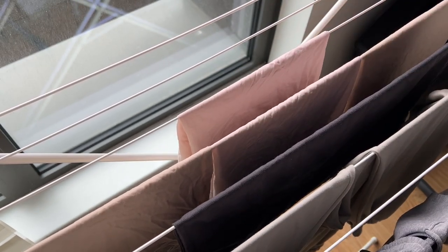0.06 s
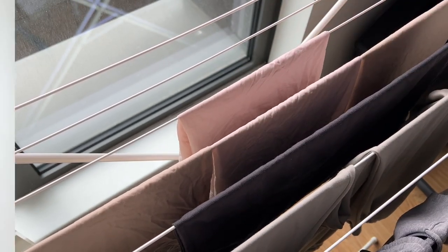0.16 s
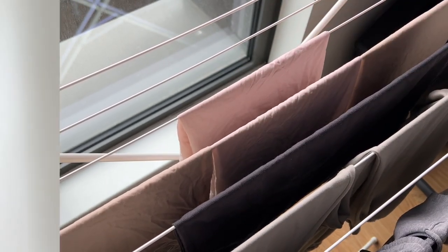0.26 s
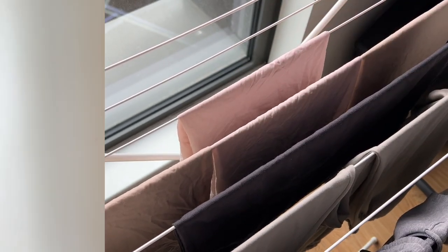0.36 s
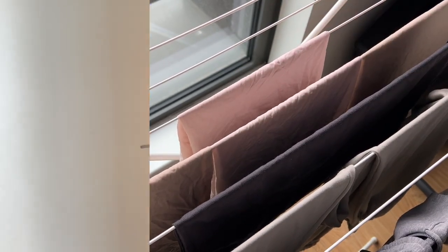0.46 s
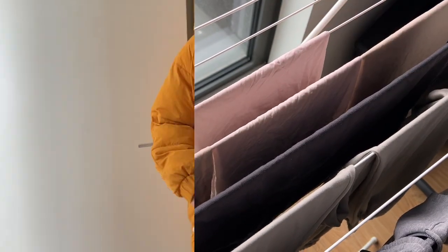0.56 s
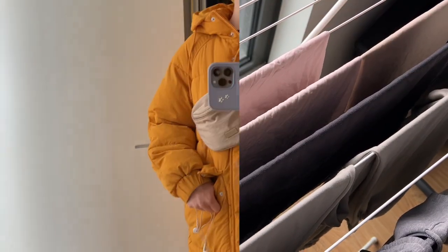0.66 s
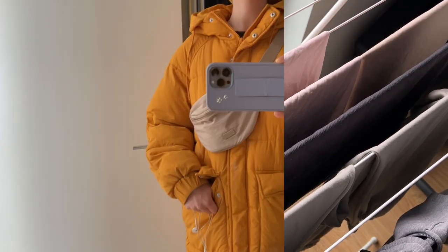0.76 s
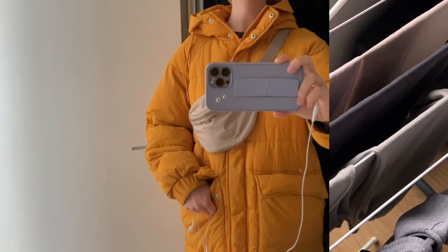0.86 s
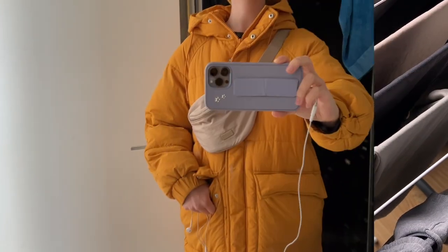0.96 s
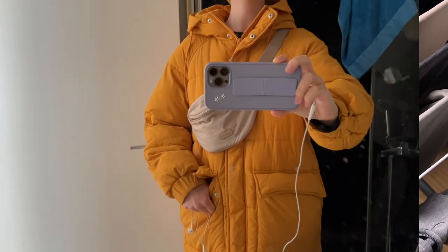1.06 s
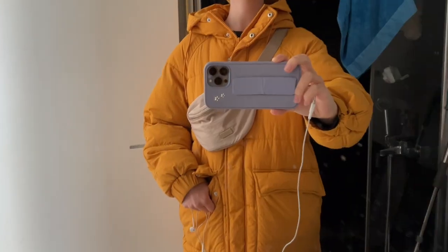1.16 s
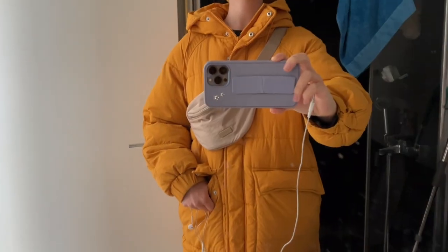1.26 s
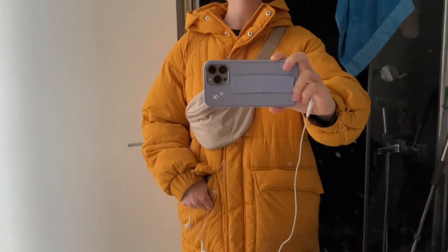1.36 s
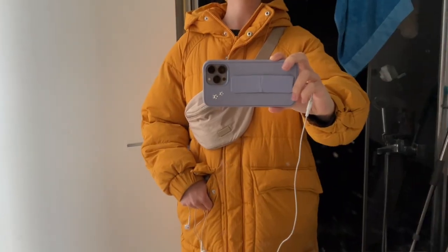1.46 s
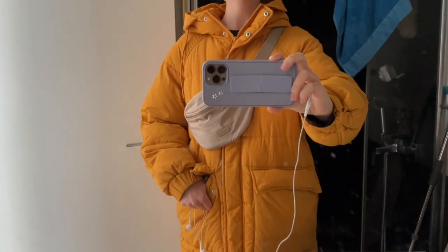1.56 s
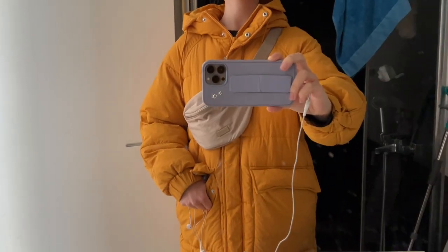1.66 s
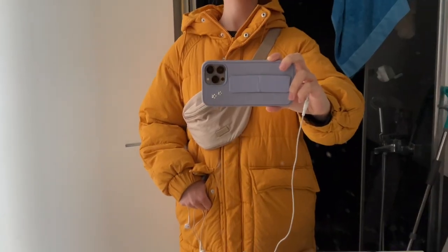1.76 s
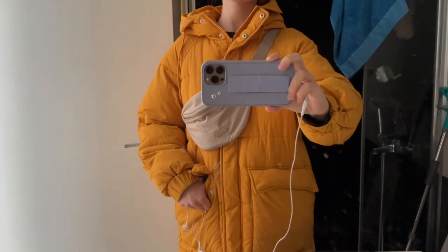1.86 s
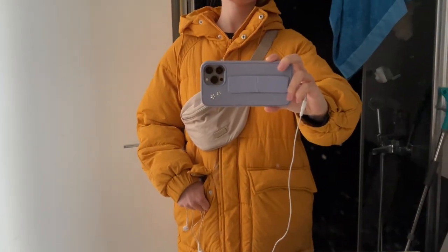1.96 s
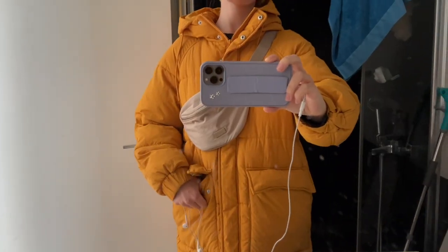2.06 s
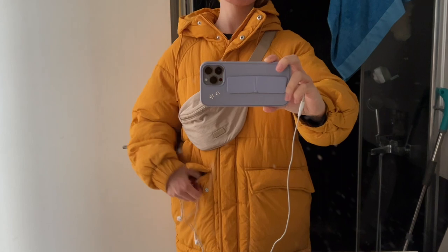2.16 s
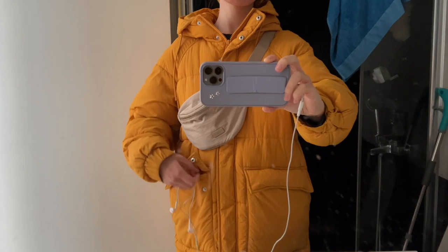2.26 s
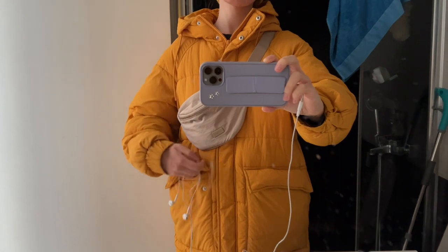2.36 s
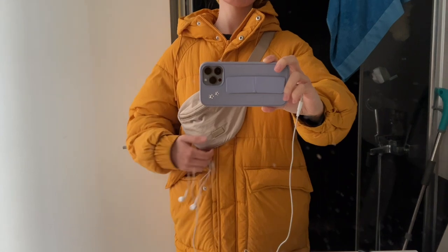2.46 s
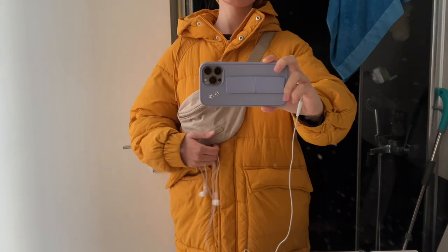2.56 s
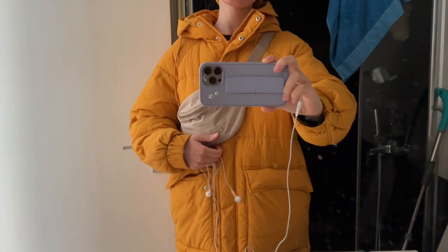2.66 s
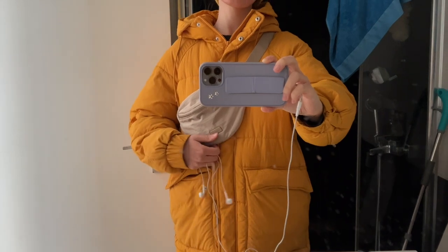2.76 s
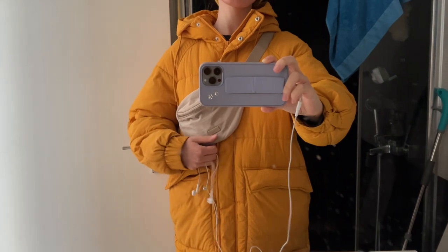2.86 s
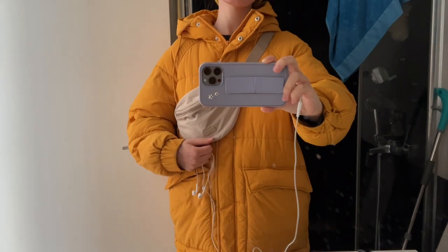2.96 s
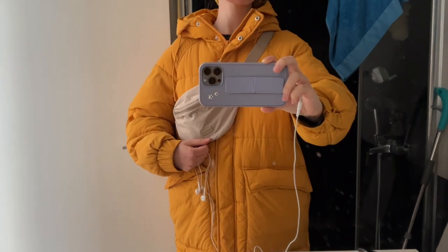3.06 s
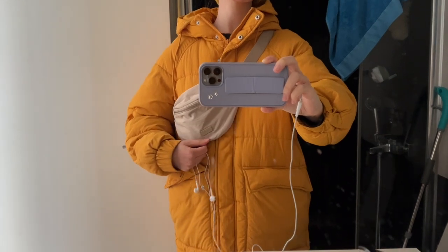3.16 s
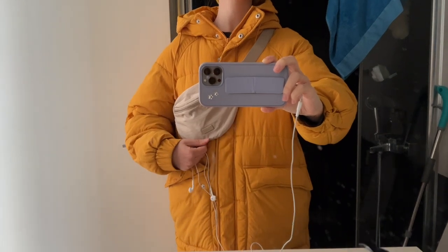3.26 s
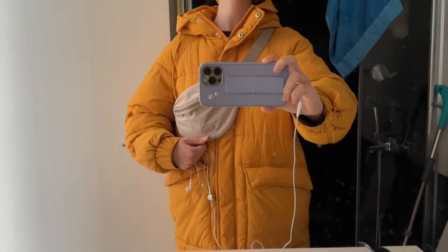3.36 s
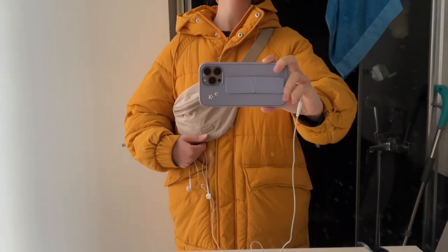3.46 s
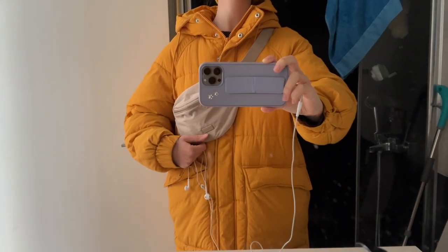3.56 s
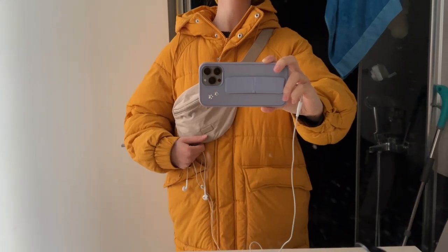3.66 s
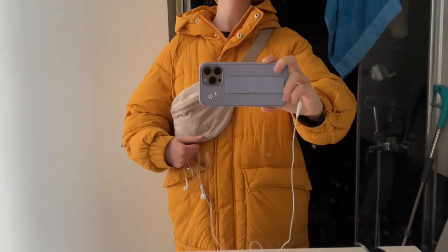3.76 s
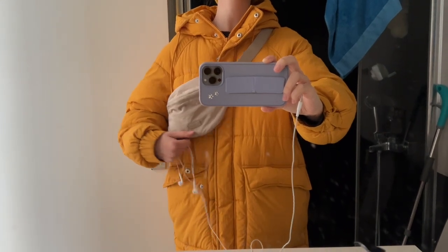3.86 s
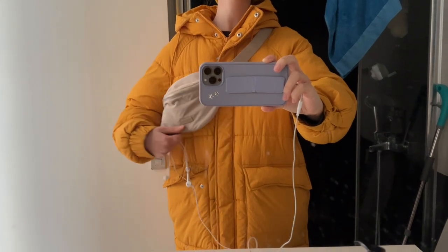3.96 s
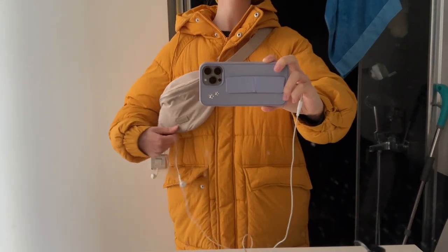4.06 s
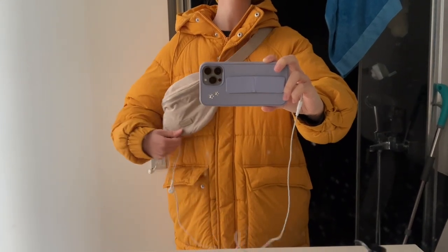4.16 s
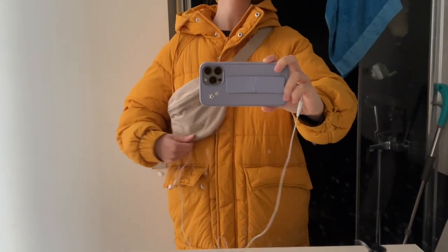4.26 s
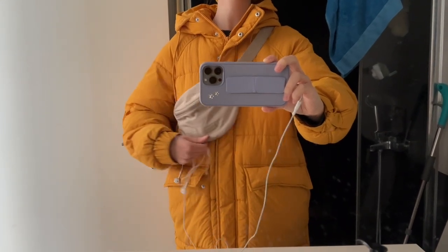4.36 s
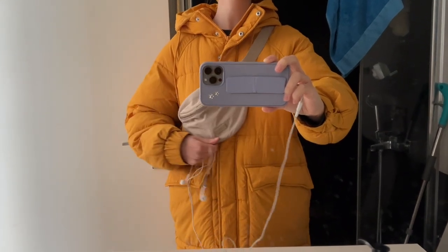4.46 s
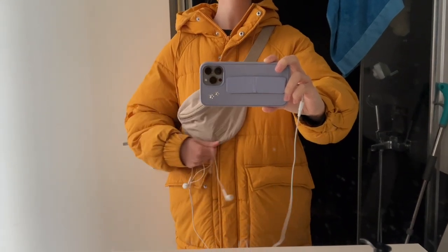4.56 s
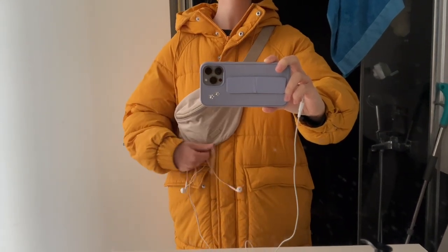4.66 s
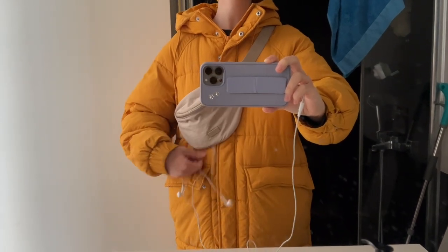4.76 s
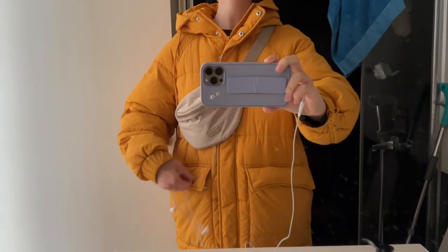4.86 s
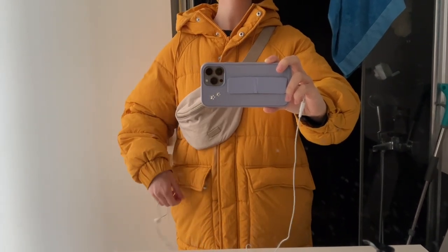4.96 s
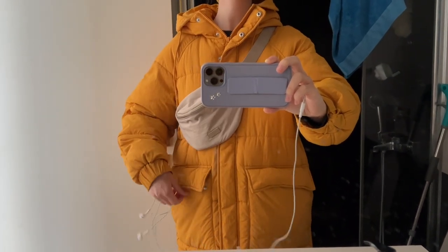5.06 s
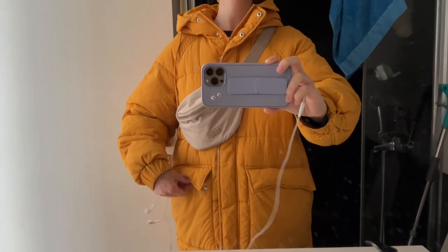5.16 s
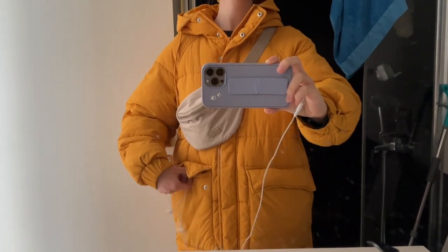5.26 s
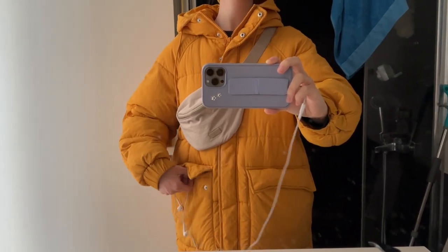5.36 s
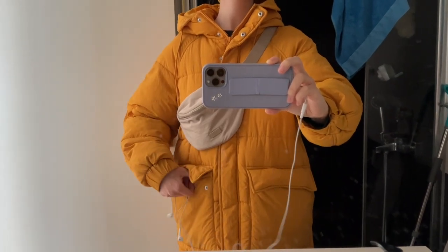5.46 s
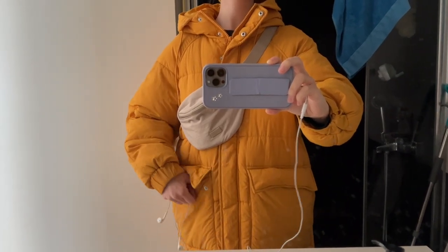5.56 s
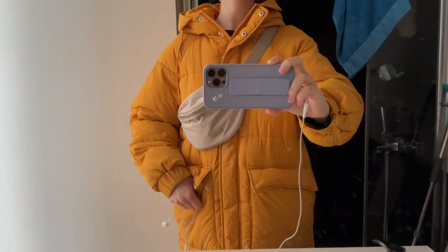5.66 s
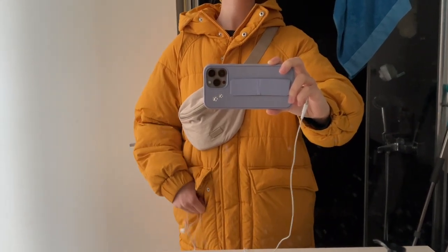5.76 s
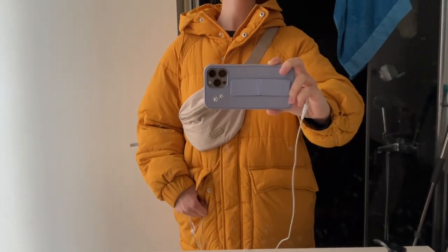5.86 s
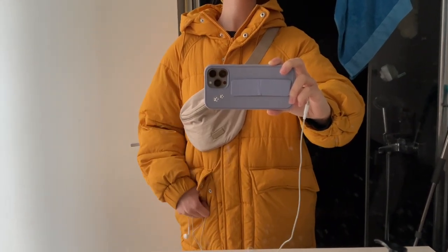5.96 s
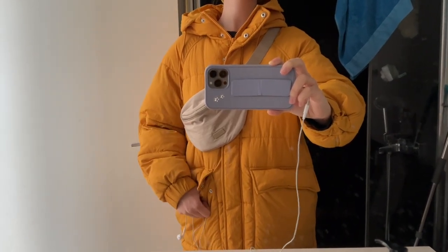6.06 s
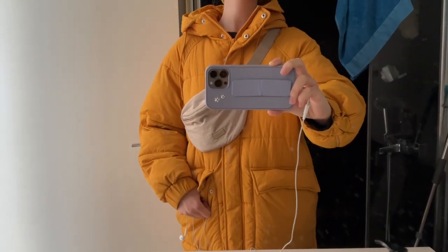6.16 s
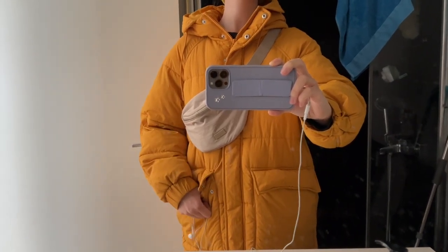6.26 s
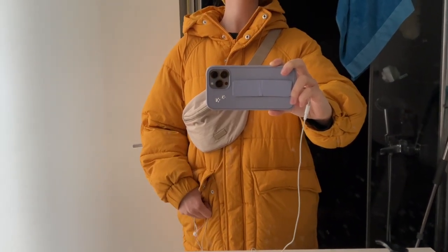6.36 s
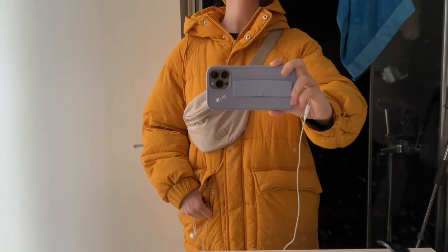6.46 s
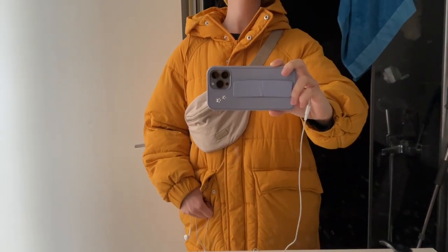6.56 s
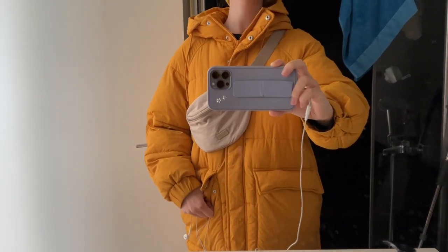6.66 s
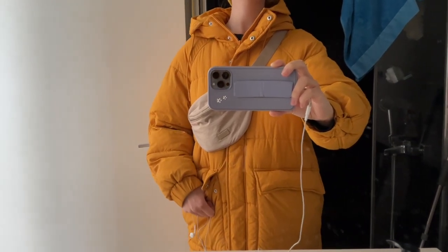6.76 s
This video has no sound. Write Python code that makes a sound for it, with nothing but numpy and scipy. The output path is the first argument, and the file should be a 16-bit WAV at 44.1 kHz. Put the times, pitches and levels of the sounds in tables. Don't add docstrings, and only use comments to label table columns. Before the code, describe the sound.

Very close handling noise in a quiet indoor room, mostly mono and slightly dull at the extreme top. Low wide droning gives way to a brief cloth rub and light taps of earphone cable. Loud bursts of nylon scratching, zip-like scrapes and crackling creases come in two busy groups with a lighter gap between. A strong knock comes late, then only sparse plastic taps, cloth ticks and faint hum.

```python
import sys
import numpy as np
from scipy import signal
from scipy.fft import rfft, irfft, next_fast_len
from scipy.io import wavfile

SR = 44100
rng = np.random.default_rng(int(sys.argv[2]) if len(sys.argv) > 2 else 0)


def convert_level_to_amplitude(level_db):
    exponent = np.asarray(level_db, float) / 20
    return 10 ** exponent


def digitize_waveform(pressure):
    field = np.atleast_2d(pressure).T
    bounded = np.clip(field, -1, 1)
    quanta = np.round(bounded * 32767).astype(np.int16)
    wavfile.write(sys.argv[1], SR, quanta)


N = 300929
TIME = np.arange(N) / SR

# (peak [s], rise [s], fall [s], scratch level [dB], folds relative to scratch [dB])
CRUMPLE_STROKES = [(0.67, 0.081, 0.079, -38.5, -6.5), (2.087, 0.071, 0.11, -32, -4.5),
                   (2.312, 0.069, 0.044, -42, -11.5), (2.476, 0.12, 0.53, -46, 0.5),
                   (2.676, 0.029, 0.012, -46, -1), (2.726, 0.014, 0.073, -48, 2),
                   (2.92, 0.13, 0.2, -42, -3), (3.31, 0.24, 0.23, -48, -4.5),
                   (3.619, 0.23, 0.72, -59, -1.5), (3.935, 0.17, .12, -49, -1.5),
                   (4.15, 0.053, 0.4, -53.5, -4.5), (4.402, 0.098, 0.094, -40, 1),
                   (4.545, 0.059, 0.18, -40, -1), (4.69, 0.083, 0.12, -46, -7),
                   (4.819, 0.13, 0.085, -42.5, -15.5), (4.931, 0.058, .05, -59, -1),
                   (5.15, 0.081, 0.12, -38, -6.5), (5.379, 0.028, 0.046, -35, -10),
                   (5.526, 0.15, 0.27, -42, -2.5), (5.8, 0.5, 0.13, -49, -1), (6.0, .2, 0.82, -81, -7)]


def rms_one(x):
    return x / np.sqrt(np.mean(x ** 2) + 1e-20)


def at_hz(points, hz):
    table_hz, values = np.array(points)[:, 0], np.array(points)[:, 1]
    return np.interp(np.log(hz), np.log(table_hz), values)


def drift(rate):
    r = np.exp(-40 * np.pi * rate / SR)
    slow = signal.lfilter([1], [1, -2 * r, r * r], rng.standard_normal(N // 20 + 2002))[2000:]
    return np.interp(np.arange(N) / 20, np.arange(len(slow)), rms_one(slow))


def coloured(spectrum):
    size = next_fast_len(N)
    hz = np.arange(size // 2 + 1) * SR / size + 1
    shaped = rfft(rng.standard_normal(size)) * convert_level_to_amplitude(at_hz(spectrum, hz))
    return rms_one(irfft(shaped, size)[:N])


def ring(x, hz, t60):
    r = convert_level_to_amplitude(-60 / (t60 * SR))
    w = 2 * np.pi * min(hz, .45 * SR) / SR
    return signal.lfilter([0, np.sin(w)], [1, -2 * r * np.cos(w), r * r], x)


def add(out, s, sound):
    i = round(s * SR)
    out[i:i + len(sound)] += sound[:N - i]


def strokes(rows, stretch=1):
    drop_db = 10
    bend = 1.6
    t, power = TIME[::32], 1e-13
    for s, rise, fall, db, side_db in rows:
        away = np.where(t < s, (s - t) / rise, (t - s) / fall) / stretch
        power = power + convert_level_to_amplitude(2 * (db - drop_db * away ** bend)) * convert_level_to_amplitude([[0], [2 * side_db]])
    return [np.interp(TIME, t, p) for p in power]


def rubbing(slips_per_s=4000, spread_db=3.0, smooth=1.9, catch_db=2.06, patchy_db=0.94,
            snaps_per_s=70, snap_db=2.5, flutter_db=0.38):
    # (low edge [Hz], high edge [Hz])
    zones = [(350, 1200), (1300, 3000), (3200, 7000), (7500, 15500)]
    # (frequency [Hz], level [dB per Hz])
    cloth_colour = [(150, -32), (250, 0), (282, -6.5), (466, -3), (963, 0), (1050, 0.5), (1130, 2.5),
                    (1960, 7.5), (2410, 6), (3350, -6), (5720, -7.5), (7160, -10.5), (9950, -15),
                    (13100, -15), (15600, -17.5)]
    # (frequency [Hz], zone number [-])
    zone_followed = [(700, 0), (1800, 1), (2700, 1), (3400, 2), (6500, 2), (9500, 3), (12500, 3),
                     (15000, 2.5)]

    grid = np.arange(100, 16000, 10.)
    power = 10 * convert_level_to_amplitude(2 * at_hz(cloth_colour, grid))
    levels = []
    for db, (low, high) in zip(zone_levels(), zones):
        levels.append(db - 10 * np.log10(power[(grid > low) & (grid < high)].sum()))

    slips = (rng.random(N) < slips_per_s / SR) * convert_level_to_amplitude(spread_db * np.minimum(rng.exponential(1, N), 4))
    grain = rms_one(smooth + rms_one(signal.lfilter([1], [1, -.8], slips)))
    crackle = (rng.random(N) < snaps_per_s / SR) * convert_level_to_amplitude(snap_db + 3.7 * rng.standard_normal(N))
    grain = grain + signal.lfilter([1], [1, -.9], crackle)
    flutter = convert_level_to_amplitude(flutter_db * drift(40.0))
    catching = convert_level_to_amplitude(catch_db * np.tanh(drift(15.4)))
    white = grain * flutter * catching * rng.standard_normal((2, N))

    edges, out = 260 * 2 ** np.arange(0, 6.1, .2), 0
    for k, (low, high) in enumerate(zip(edges, edges[1:])):
        hz = np.sqrt(low * high)
        place = np.clip(at_hz(zone_followed, hz), 0, 3)
        below = min(int(place), 2)
        db = levels[below] + (place - below) * (levels[below + 1] - levels[below])
        band_filter = signal.butter(3, [low, high], "band", fs=SR, output="sos")
        band = signal.sosfilt(band_filter, white[k % 2])
        out = out + band * convert_level_to_amplitude(db + at_hz(cloth_colour, hz) + shadow_db(hz) + patchy_db * drift(6.9))
    return out * np.sqrt(SR / 2)


def zone_levels():
    # (peak [s], rise [s], fall [s], hiss level [dB], weave relative to hiss [dB])
    slide_strokes = [(0.64, 0.049, 0.092, -44, -2.5), (1.99, .035, .05, -56, -9),
                     (2.054, 0.036, 0.3, -39, -4), (2.188, 0.12, 0.057, -39.5, 0),
                     (2.3, 0.055, 0.077, -43.5, -2.5), (2.405, 0.088, 0.075, -40, -9),
                     (2.485, 0.045, 0.22, -44.5, -2), (2.676, 0.048, 0.046, -46, -1.5),
                     (2.726, 0.034, 0.071, -44.5, -2), (2.84, 0.081, 0.12, -47, 1),
                     (2.93, 0.12, 0.21, -40, -6.5), (3.13, .1, .1, -52, -6), (3.306, 0.12, 0.16, -41, -7.5),
                     (3.6, 0.25, 0.95, -55, -10), (3.93, 0.072, 0.11, -43, -4),
                     (4.144, 0.06, 0.21, -51, -6.5), (4.39, 0.078, 0.07, -32.5, -16),
                     (4.545, .03, 0.068, -34.5, -19.5), (4.646, 0.11, 0.16, -34, -8.5),
                     (4.82, 0.069, 0.11, -36, -6), (5.156, 0.067, 0.086, -39.5, -3),
                     (5.372, 0.025, 0.076, -45, -2), (5.5, 0.22, 0.33, -47.5, -2.5),
                     (5.8, 0.23, 0.056, -62, 9), (6.1, 0.084, 0.28, -71.5, -2.5)]
    scratch, folds = strokes(CRUMPLE_STROKES)
    hiss, weave = strokes(slide_strokes)
    weave = weave + scratch * convert_level_to_amplitude(2 * -14)
    return 10 * np.log10([folds, scratch, weave, hiss])


def shadow_db(hz):
    # (centre [s], duration [s], frequency [Hz], width [octaves], level [dB])
    cancelled = [(2.18, 0.29, 7500, .3, -11), (2.355, 0.13, 7000, .4, -4), (2.63, .1, 9000, .6, -4),
                 (2.78, 0.087, 9000, .6, -7), (3.1, 0.39, 4300, .35, -7), (3.12, .25, 7500, .25, -5),
                 (3.55, 0.23, 4600, .5, -3), (3.8, 0.31, 5000, .3, -2), (4.287, .14, 4000, .4, -4),
                 (4.42, 0.26, 4100, .35, -3), (4.62, 0.22, 4200, .35, -14), (4.757, 0.054, 6000, .6, -1),
                 (5.15, 0.17, 7300, .3, -2.5), (5.6, 0.89, 7200, .25, -9), (0.66, 0.22, 6500, .3, -3.5),
                 (4.502, 0.12, 3700, 1, -7), (4.96, 0.087, 7100, 1.1, -9), (4.1, 0.12, 7000, 1.1, -2.5),
                 (3.6, .3, 910, 1.3, -1)]
    t, loss = TIME[::64], 0
    for s, lasts, dip_hz, octaves, db in cancelled:
        off_pitch = np.log2(hz / dip_hz) * 2 / octaves
        off_time = (t - s) * 2 / lasts
        loss = loss + db * np.exp(-off_pitch ** 2 - off_time ** 2)
    return np.interp(TIME, t, loss)


def sticking():
    # (centre [s], length [ms], level [dB])
    holds = [(2.294, 15, -13), (2.4455, 8, -11), (2.361, 8, -5), (5.3855, 17, -12), (5.404, 10, -5),
             (5.922, 32, -5), (0.583, 14, -4), (1.92, 76, -6), (2.262, 10, -4), (2.70, 12, -4),
             (2.755, 12, -3), (2.433, 5, -8), (0.52, 105, -12), (0.82, 100, -12), (5.008, 34, -9),
             (4.495, 30, -4)]
    return convert_level_to_amplitude(sum(db * np.exp(-((TIME - s) * 2000 / ms) ** 4) for s, ms, db in holds))


def swipes(swell=0.3, stop_ms=9.0, grain_db=2.0):
    # (start [s], stop [s], frequency [Hz], width [Hz], level [dB])
    sung_bands = [(0.611, 0.753, 1620, 885, -42.5), (2.077, 2.167, 10800, 2490, -37),
                  (2.2, 2.956, 12700, 1500, -55.5), (2.087, 2.243, 5140, 1500, -46),
                  (2.394, 2.443, 12000, 3000, -42), (2.477, 2.509, 11500, 3000, -44),
                  (2.644, 2.688, 4530, 1200, -49), (2.47, 2.492, 1560, 700, -42),
                  (2.62, 2.74, 1450, 686, -43), (2.87, 2.983, 2100, 800, -45),
                  (2.808, 2.883, 4500, 1190, -46), (2.875, 2.95, 5700, 1000, -46),
                  (2.9, 3.0, 13200, 1170, -48), (2.894, 2.988, 9400, 1470, -47),
                  (3.227, 3.452, 8950, 3100, -47), (2.87, 4.56, 6930, 1520, -57.5),
                  (3.676, 3.876, 2120, 600, -53.5), (3.868, 4, 2240, 700, -47.5),
                  (4.327, 4.47, 8700, 3340, -40), (4.357, 4.461, 2020, 600, -41.5),
                  (4.503, 4.608, 1950, 700, -40), (4.56, 4.614, 9950, 2500, -32.5),
                  (4.512, 4.622, 6040, 1200, -45.5), (4.613, 4.675, 10900, 2700, -28.5),
                  (4.754, 4.92, 2540, 850, -39.5), (4.775, 4.83, 2330, 690, -49),
                  (4.778, 4.851, 11300, 2600, -28), (4.916, 4.975, 2900, 1200, -51.5),
                  (5.115, 5.209, 5600, 695, -45), (5.125, 5.177, 1420, 600, -42),
                  (5.366, 5.374, 1850, 500, -35), (5.173, 5.198, 3350, 1200, -38),
                  (5.41, 5.9, 11900, 2000, -61.5), (5.43, 5.632, 5900, 900, -57),
                  (5.126, 5.2, 8600, 1800, -43.5), (5.5, 5.53, 11000, 3000, -46),
                  (5.9, 6.82, 12500, 1600, -82), (6.001, 6.797, 2440, 1000, -75.5)]
    out = np.zeros(N)
    white = rng.standard_normal(N) * convert_level_to_amplitude(grain_db * drift(270))
    for start, stop, hz, width_hz, db in sung_bands:
        span = slice(round(start * SR), round(stop * SR))
        t60, length = 1.8 / width_hz, stop - start
        sung = ring(ring(white[span], hz, t60), hz, t60)
        growth = (np.abs(TIME[span] - start) / length) ** swell
        ending = np.clip((stop - TIME[span]) / (stop_ms / 1000 + .08 * length), 0, 1)
        out[span] += convert_level_to_amplitude(db) * rms_one(sung * growth * ending)
    return out


def zips(wobble_hz=46, uneven_db=3.8, second_db=-26):
    # (time [s], rib rate [Hz], level [dB])
    rib_runs = [
        [(2.128, 700, -33), (2.138, 760, -32), (2.144, 889, -26.5), (2.156, 968, -31.5), (2.186, 1190, -29),
         (2.191, 1200, -37), (2.196, 1330, -30), (2.206, 1265, -36), (2.222, 1310, -37)],
        [(4.77, 2500, -46), (4.79, 2246, -46), (4.815, 1980, -44), (4.83, 2150, -46)],
        [(4.835, 2420, -39), (4.86, 2640, -35.5), (4.878, 2880, -39)],
        [(5.07, 1380, -53), (5.076, 1445, -41), (5.09, 1625, -52), (5.108, 1900, -32), (5.116, 1974, -29),
         (5.125, 2090, -30), (5.13, 2150, -38), (5.138, 2171, -48)],
        [(5.33, 243, -57), (5.355, 682, -38.5), (5.372, 1260, -42)],
        [(5.4, 1580, -46), (5.415, 1360, -44), (5.43, 1260, -36)],
        [(5.42, 2415, -49), (5.44, 2850, -40.5), (5.468, 2940, -41), (5.482, 2340, -48)],
        [(5.5, 1210, -44), (5.518, 960, -41)],
    ]
    out = np.zeros(N)
    waver, uneven = drift(240), np.tanh(drift(260))
    for rows in rib_runs:
        s, hz, db = np.transpose(rows)
        span = slice(round(s[0] * SR), round(s[-1] * SR))
        t = TIME[span]
        phase = 2 * np.pi * np.cumsum(np.interp(t, s, hz) + wobble_hz * waver[span]) / SR
        edge = np.clip(np.minimum(t - s[0], s[-1] - t) / 0.0014, 0, 1)
        tone = np.sin(phase) + convert_level_to_amplitude(second_db) * np.sin(2 * phase)
        out[span] += np.sqrt(2) * tone * edge * convert_level_to_amplitude(np.interp(t, s, db) + uneven_db * uneven[span])
    return out


def cable(recover_hz=45):
    # (frequency [Hz], level [dB per Hz])
    wire_colour = [(12, -40), (20, -6.5), (70, -3), (114, -3), (367, -9.5), (437, -15.5), (500, -11),
                   (650, -25), (1100, -120)]
    # (time [s], peak [dB], width [ms], direction [+1 or -1])
    capsule_tugs = [(2.3041, -21, 0.57, 1), (2.3074, -21, 0.39, 1), (2.315, -23, 1.4, 1),
                    (2.318, -23, 2.8, 1), (2.323, -31, 4.1, -1), (2.405, -30, 1.6, 1), (2.45, -25.5, 1, 1),
                    (2.452, -16, 0.4, 1), (2.639, -31, 1.8, 1), (4.68, -22, 0.59, -1), (4.683, -32, 3.4, 1),
                    (4.81, -29, 0.78, 1), (4.901, -27, 0.88, 1), (4.915, -28, 4.2, 1),
                    (5.157, -21.5, 1.4, -1), (5.211, -34, 2.4, -1), (5.217, -24, 3.6, 1),
                    (5.38, -26.5, 5.5, 1), (5.388, -34, 4.5, -1), (5.65, -32, 1, 1),
                    (5.864, -30.5, 0.44, 1), (5.899, -31.5, 1.2, 1)]
    pushes = np.zeros(N)
    for s, db, ms, way in capsule_tugs:
        t = np.arange(-441, 882) / SR * 1000 / ms
        steepness = np.where(t < 0, 9, 1.6)
        add(pushes, s - .01, np.sign(way) * convert_level_to_amplitude(db) * np.exp(-steepness * t ** 2))
    pushes = signal.lfilter(*signal.butter(1, recover_hz, "high", fs=SR), pushes)
    return pushes + shaking() * coloured(wire_colour)


def shaking():
    # (time [s], level [dB])
    wire_yanks = [(2.0, -46), (2.155, -54), (2.44, -52), (2.58, -47), (2.87, -50), (4.37, -61), (4.78, -41),
                  (4.89, -45), (5.1, -46), (5.51, -46), (5.8, -45)]
    shake_db, share, lingers = -48.5, 0.59, 1.22
    yank_s = 0.027
    rows = [(s, rise, fall, shake_db + share * (db + 40), 0)
            for s, rise, fall, db, _ in CRUMPLE_STROKES if db > -60]
    rows += [(s, yank_s, yank_s, db, 0) for s, db in wire_yanks]
    return np.sqrt(strokes(rows, stretch=lingers)[0])


def taps(cycles=5.6, lower_hz=470, lower_db=-1, contact=.27, apart=.45, rebound=1.35,
         rattle_ms=2.6, rattle_hz=(2350, 3700, 5600), rattle_t60=.0048):
    # (time [s], peak [dB], ring [Hz], rattle relative to peak [dB])
    cable_taps = [(0.8285, -36, 1570, -22), (0.8485, -45, 1490, -14), (0.8666, -49, 1210, -8),
                  (0.9446, -40, 1390, -14), (1.0042, -39, 1500, -14), (1.0476, -40, 1390, -14),
                  (1.1294, -38, 1300, -20), (0.918, -50, 1500, -12), (1.217, -49, 800, -12),
                  (1.2298, -34.5, 1320, -20), (1.6535, -34, 1400, -26), (1.9227, -48, 1000, -20),
                  (1.9239, -34, 1630, -26), (1.9601, -39.5, 1330, -12), (2.3174, -21, 1740, -12),
                  (2.33, -28, 1430, -6), (3.674, -35, 2000, -13),
                  (5.323, -35, 1800, -14), (5.3944, -8, 1013, -30), (6.0651, -50, 851, -10),
                 (6.0933, -47, 1000, -8), (6.1187, -44, 813, -12), (6.1589, -43, 1240, -4),
                 (6.1997, -49, 1000, -6), (6.355, -52, 1500, -8), (6.2549, -41, 786, -12),
                 (6.3172, -46, 900, -8), (6.5075, -39.5, 1100, -4), (6.5688, -41.5, 960, -5),
                 (6.6117, -50, 960, 0), (6.6749, -42, 1250, -8), (6.7553, -42, 1135, -10),
                 (6.7984, -47, 990, -8), (6.8012, -51, 900, -8)]
    rows = cable_taps
    out, chance = np.zeros(N), rng.random((len(rows), 5, 3))
    for (s, db, hz, rattle_db), knocks in zip(rows, chance):
        push, hit, loose = np.hanning(int(contact * SR / hz) + 3), np.zeros(900), np.zeros(900)
        add(hit, 0, -push)
        add(hit, apart / hz, rebound * push ** 2)
        soft = db < -15
        lasts = cycles / (2 if db > -15 else 1)
        sound = ring(hit, hz, lasts / hz)
        sound = sound + convert_level_to_amplitude(lower_db) * ring(hit, lower_hz, lasts / 900) * soft
        for late, size, _ in knocks:
            add(loose, 1 / hz + late * rattle_ms / 1000, (2 * size - 1) * np.hanning(6))
        rattle = 0
        for mode_hz, shift in zip(rattle_hz, knocks[:, 2]):
            mode = ring(loose, mode_hz * (.94 + .12 * shift), rattle_t60)
            rattle = rattle + mode * (rattle_hz[0] / mode_hz) ** 1.6
        sound = sound / np.abs(sound).max() + convert_level_to_amplitude(rattle_db) * rattle / np.abs(rattle).max()
        add(out, s - .47 / hz, convert_level_to_amplitude(db) * sound)
    return out


def creases(cycles=7.0, faint_db=-56, spread_db=8.0, crack_db=-3, crack_ms=.12):
    # (time [s], peak [dB], ring [Hz])
    crease_snaps = [(0.523, -45, 9000), (0.761, -40, 10500), (0.774, -43, 10000), (0.793, -45, 2200),
                    (0.808, -48, 8000), (0.8156, -52.5, 10200), (0.8565, -43, 8000), (0.8684, -48, 6950),
                    (0.879, -48, 4600), (0.9, -56, 10500), (0.9169, -52, 7430), (0.931, -48, 8000),
                    (0.95, -54, 3500), (0.966, -50, 8000), (0.9786, -41, 9200), (0.9895, -45, 6000),
                    (1.03, -53, 10000), (1.053, -58, 7000), (1.1084, -55, 8000), (1.15, -51, 9000),
                    (1.1628, -48, 10000), (1.2299, -48, 3990), (1.25, -40, 10000), (1.2503, -46, 7300),
                    (1.9241, -50, 6000), (1.3349, -49, 8270), (1.4487, -53, 10600), (1.664, -49, 8800),
                    (1.959, -45, 10300),
                    (1.973, -41, 5000), (2.303, -32, 4820), (2.319, -25, 5100), (2.451, -23, 10500),
                    (2.475, -34, 5290), (2.738, -33, 5120), (3.508, -40, 12000), (3.555, -41, 6500),
                    (3.63, -43, 8850), (3.668, -35, 13000), (3.676, -34, 8000), (3.682, -40, 5850),
                    (3.688, -40, 9000), (3.694, -30, 7590), (3.702, -40, 4870), (3.743, -40, 2580),
                    (3.755, -37, 8000), (3.805, -42, 2380), (4.11, -31, 10500), (5.0147, -43, 10400),
                    (5.0272, -37, 2500), (5.053, -41, 3080), (5.3933, -23, 12600), (5.6043, -30, 5600),
                    (5.7088, -34, 4460), (5.842, -40, 4310),
                    (5.947, -46, 2100), (5.948, -50, 5000), (6.035, -50, 13000), (6.09, -52, 10000),
                  (6.113, -47, 5000), (6.13, -49.5, 4500), (6.153, -44, 9670), (6.168, -46, 11000),
                  (6.2, -55, 3000), (6.225, -51, 5450), (6.255, -48, 9000), (6.3166, -53, 5500),
                  (6.44, -57, 4000), (6.485, -52, 10500), (6.5085, -54, 12500), (6.5715, -56, 4940),
                  (6.6, -53, 12000), (6.612, -51, 8000), (6.675, -53, 5000), (6.716, -54, 5000),
                  (6.7363, -50, 5020), (6.755, -54, 4000)]
    # (start [s], time constant [s], count [snaps])
    relaxing = [
        (0.74, .25, 40),
        (5.88, .22, 60),
        (1.2, .6, 12),
        (6.2, .5, 45),
        (3.45, .3, 25),
    ]
    out, rows = np.zeros(N), crease_snaps
    for s, slow, count in relaxing:
        for a, b, c in rng.random((count, 3)):
            rows.append((s - slow * np.log(a), faint_db - spread_db * b - 5 * (1 - c), 3500 * 4 ** c))
    count = len(rows)
    cracks = np.diff(rng.standard_normal((count, 41))) * np.exp(-TIME[:40] * 1000 / crack_ms)
    seconds = rng.uniform(0.24, 1.26, count)
    delays = rng.uniform(.0005, .0025, count)
    for (s, db, hz), second, crack, again in zip(rows, seconds, cracks, delays):
        turns = np.arange(int(cycles * SR / hz)) * hz / SR
        tick = np.sin(2 * np.pi * turns) + .5 * np.sin(2 * np.pi * second * turns)
        tick = tick * turns * np.exp(1 - turns)
        add(out, min(s, TIME[-1]), convert_level_to_amplitude(db - 4) * tick)
        add(out, min(s + again, TIME[-1]), convert_level_to_amplitude(db - 9) * tick)
        add(out, min(s, TIME[-1]), convert_level_to_amplitude(db + crack_db) * crack / np.abs(crack).max())
    return out


def room():
    # (frequency [Hz], level [dB per Hz])
    floor_colour = [(12, -26), (20, -10), (44, -34), (101, -3.5), (226, -10), (373, -10), (493, -14),
                    (599, -12.5), (1110, -20.5), (1460, -20.5), (3460, -28), (10300, -29), (15600, -30)]
    # (frequency [Hz], width [Hz], level [dB])
    hum_bands = [
        (93.8, 9.7, -60.5),
        (10600, 70, -87),
    ]
    out = convert_level_to_amplitude(-64.5) * coloured(floor_colour)
    for hz, width_hz, db in hum_bands:
        hum = ring(rng.standard_normal(N + SR), hz, 1.8 / width_hz)[SR:]
        sounding = (TIME < 2.0) | (hz < 1000)
        out += sounding * convert_level_to_amplitude(db) * rms_one(hum)
    return out


def earlier_room():
    # (time [s], level [dB])
    fade_levels = [(0, -43), (0.3, -44), (0.55, -47.5), (0.8, -53), (1.0, -56), (1.1, -60.5), (1.15, -85)]
    # (frequency [Hz], level [dB per Hz])
    mid_colour = [(15, -43), (25, -26), (45, -2), (131, -3), (243, 2), (386, -17.5), (488, -15), (700, -22),
                  (1010, -18.5), (1270, -25), (1440, -23.5), (3660, -42.5), (4270, -45), (12000, -68),
                  (15600, -109), (22000, -120)]
    # (frequency [Hz], level [dB per Hz])
    side_colour = [(24, -48), (40, -14), (106, -17), (180, -6), (218, -9.5), (264, -3), (377, -21),
                   (425, -14), (979, -14), (5860, -44.5), (12000, -58), (14500, -55), (15600, -86),
                   (22000, -120)]
    s, db = np.transpose(fade_levels)
    fade_out = convert_level_to_amplitude(np.interp(TIME, s, db, right=-130))
    side = convert_level_to_amplitude(-12) * coloured(side_colour)
    return fade_out * (coloured(mid_colour) + side * np.array([[1], [-1]]))


def scene():
    near = sticking() * rubbing() + swipes() + zips() + cable() + taps()
    fade_in = np.interp(TIME, [0, .15, .5, 1.1], [0, .03, .45, 1])
    return near + fade_in * (room() + creases()) + earlier_room()


def roll_off(x):
    return signal.sosfilt(signal.butter(12, 16640, fs=SR, output="sos"), x)


def record(dry):
    low_pass = signal.ellip(10, .5, 55, 15780, fs=SR, output="sos")
    mix = signal.sosfilt(low_pass, dry)
    return roll_off(mix)


dry = scene()
out = record(dry)
digitize_waveform(out)
```